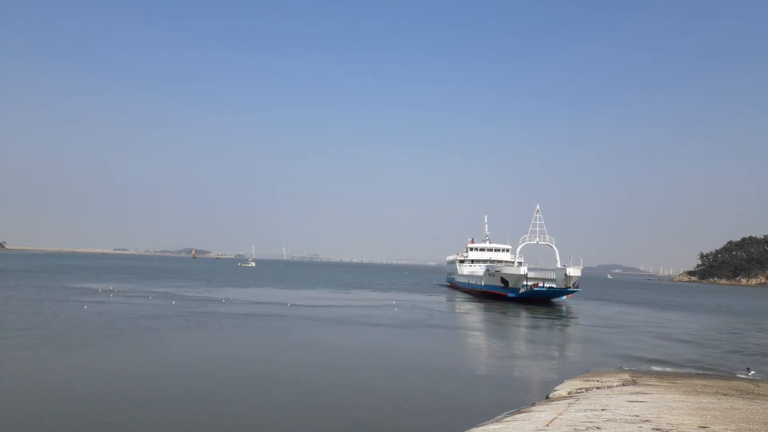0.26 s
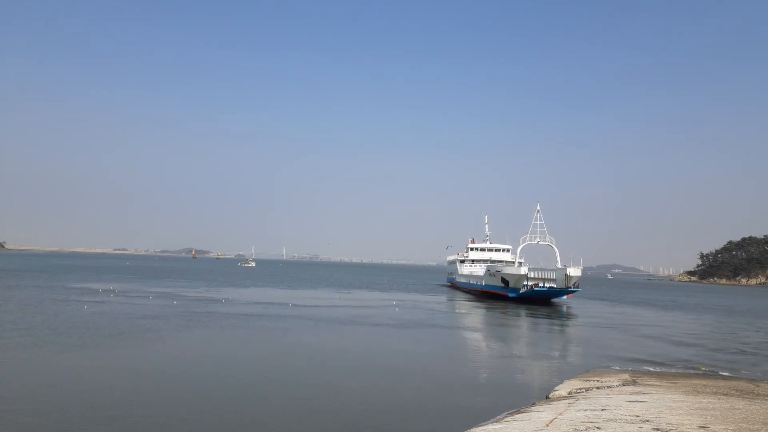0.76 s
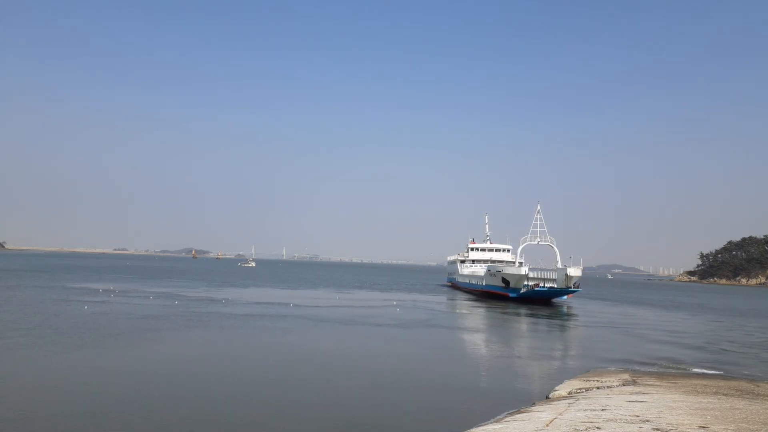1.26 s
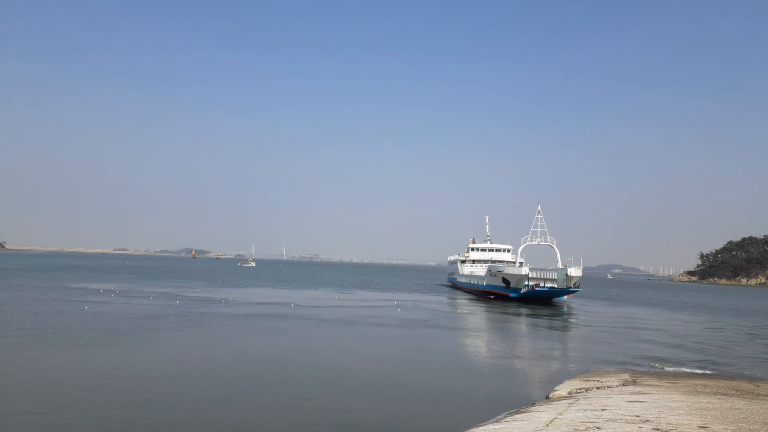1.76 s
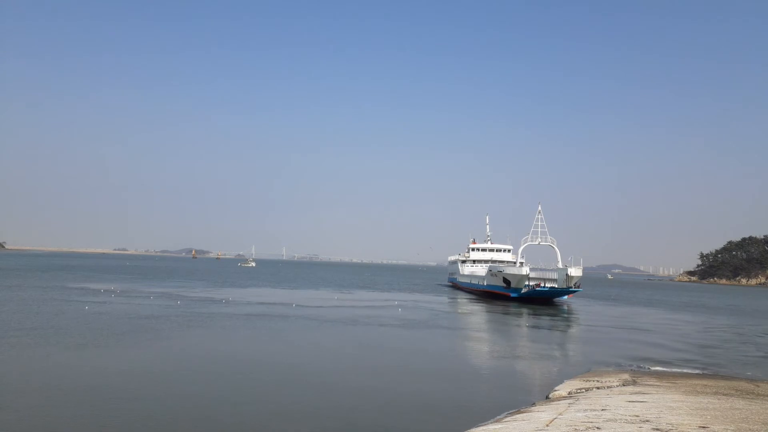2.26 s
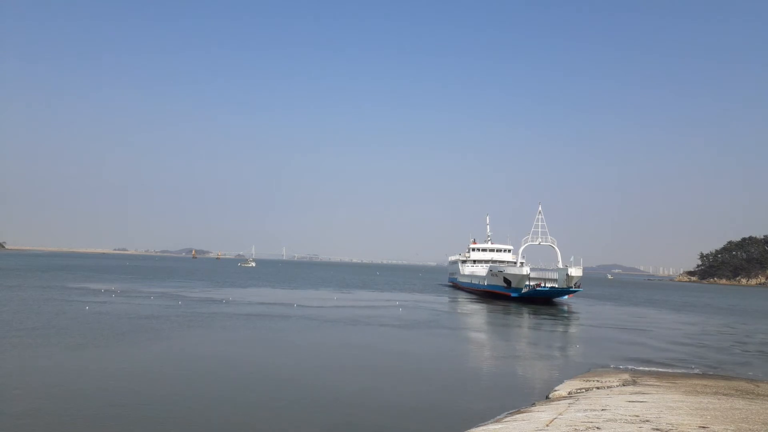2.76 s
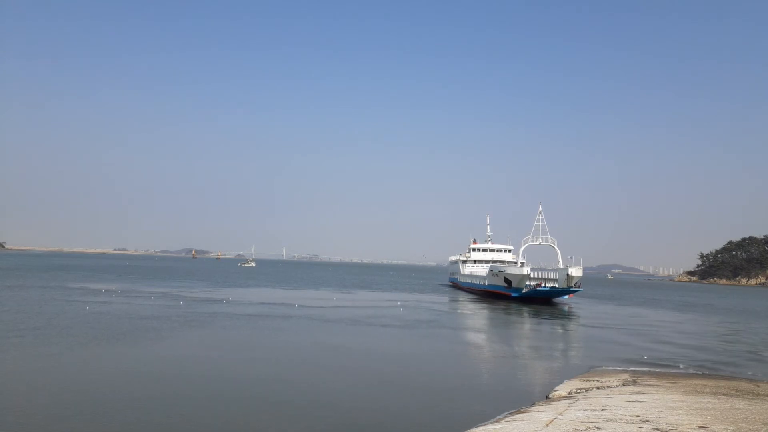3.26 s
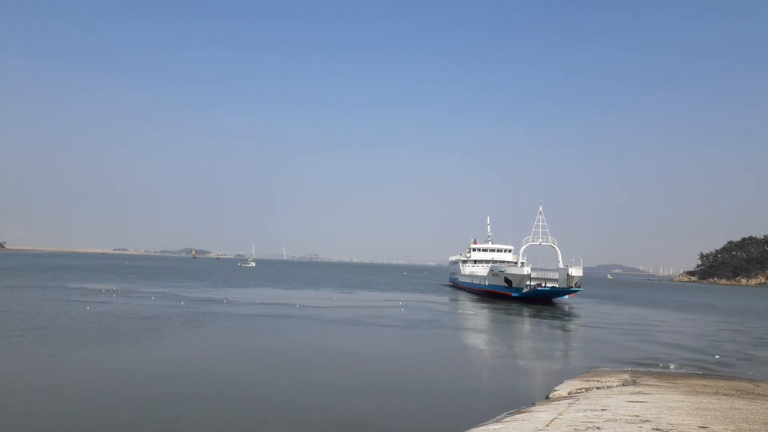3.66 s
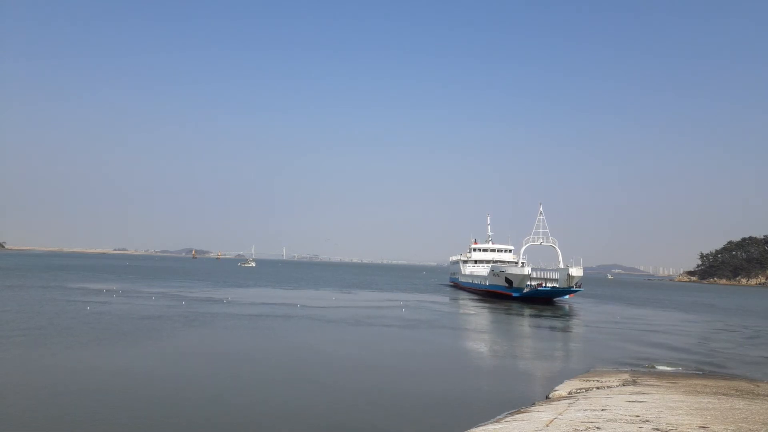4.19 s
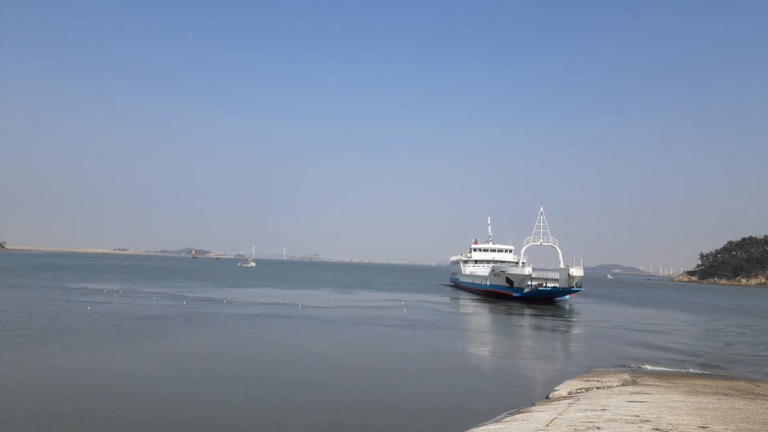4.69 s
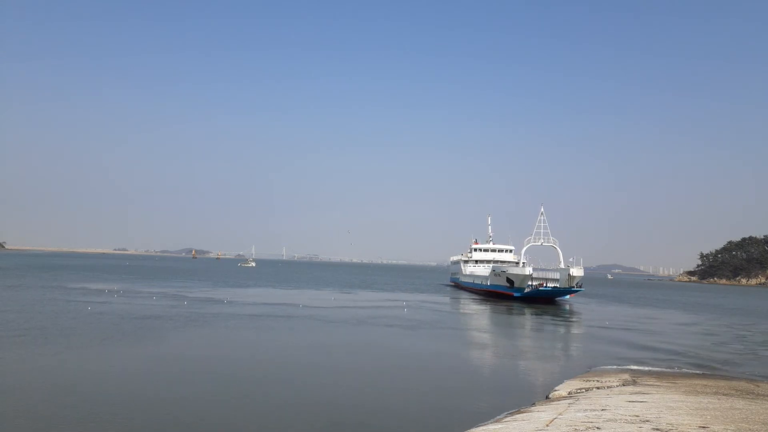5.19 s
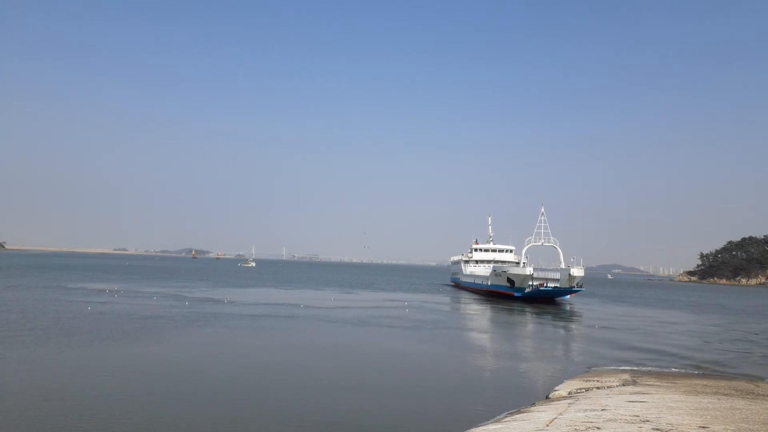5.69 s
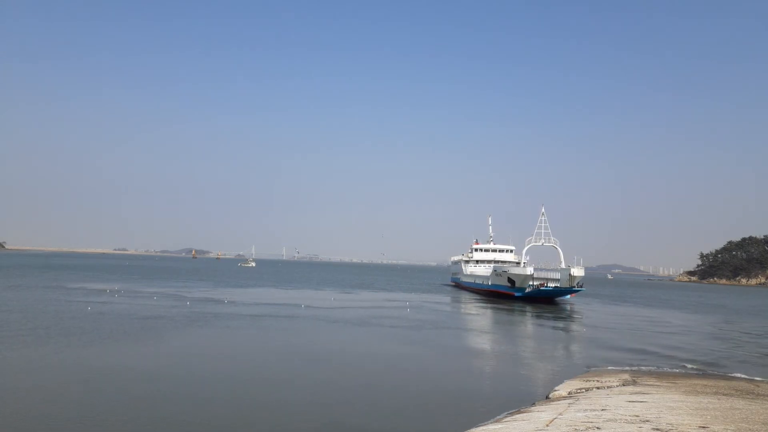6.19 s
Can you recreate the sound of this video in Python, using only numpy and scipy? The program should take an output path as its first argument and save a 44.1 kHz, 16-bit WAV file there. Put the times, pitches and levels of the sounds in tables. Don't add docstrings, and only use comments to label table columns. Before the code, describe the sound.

Three brief, rising-then-sagging seagull cries sound over a boat diesel's broad low rumble, with faint lapping water and soft microphone hiss.

```python
import sys
import numpy as np
from scipy import signal
from scipy.fft import rfft, irfft
from scipy.io import wavfile
from scipy.ndimage import uniform_filter1d, map_coordinates

SR = 44100
rng = np.random.default_rng(int(sys.argv[2]) if len(sys.argv) > 2 else 0)


def gain_from_db(level_db):
    decades = np.asarray(level_db, float) / 20
    return 10 ** decades


def file_out(sig):
    cols = np.atleast_2d(sig).T
    lim = np.clip(cols, -1, 1)
    pcm = np.round(lim * 32767).astype(np.int16)
    wavfile.write(sys.argv[1], SR, pcm)


N = 284004

# frequency in Hz, density in dB per Hz.
HISS_COLOUR = [(2000, -27), (3300, -8), (3700, -15.5), (4500, -9), (5300, -5), (5700, -2), (8000, 0),
               (9900, -1.5), (10200, -5), (11500, -6), (11800, -10.5), (15700, -9)]
# time in seconds, level in dB, swing in Hz, length in seconds.
AIR_PUSHES = [
    (1.105, -25, 80, .0075),
    (1.122, -31, 80, .005),
    (5.938, -32, 90, .007),
    (6.081, -33, 80, .008),
]

# time in seconds, level in dB, length in seconds.
SLAPS = [
    (2.775, -54.5, 0.034),
    (5.3, -65, 0.067),
    (1.11, -56, 0.024),
    (.88, -67, 0.048),
    (1.4, -67, 0.036),
]
# frequency in Hz, density in dB per Hz.
SLAP_COLOUR = [(400, -30), (700, -2), (1000, 0), (1300, -15), (2500, -34), (4500, -44), (7000, -60)]

# multiple of the firing rate, level in dB.
FIRING_ORDERS = [(1, -63), (2, -48.5), (3, -58), (5, -68)]
# frequency in Hz, level in dB.
MACHINE_HUMS = [(59.9, -63), (72, -57), (76.55, -57), (83.5, -54), (84.4, -58), (89.3, -60), (119.5, -63),
                (153.1, -62)]
# time in seconds, level in dB.
ENGINE_REACH = [(0.0, -47.5), (0.38, -47.5), (0.72, -46), (1.27, -46.5), (1.5, -47.5), (2.11, -45.5),
                (2.67, -47.5), (2.82, -48.5), (4.14, -48.5), (4.64, -46.5), (4.9, -48.5), (6.44, -46.5)]
# time in seconds, level in dB.
LINE_CARRY = [(0.0, -39.5), (0.52, -43), (1.54, -48.5), (1.67, -36.5), (1.92, -53), (2.33, -38),
              (2.56, -45), (3.19, -49), (4.21, -41), (4.41, -48.5), (4.55, -38.5), (5.06, -47),
              (5.26, -41.5), (5.65, -51.5), (6.04, -37), (6.44, -57)]
# frequency in Hz, density in dB per Hz.
RUMBLE_COLOUR = [(20, -49), (33, -28.5), (52, -3), (75, 2.5), (110, -2.5), (180, -7.5), (260, -20)]
# frequency in Hz, density in dB per Hz.
ROAR_COLOUR = [(120, -36.5), (180, -3), (280, -4), (430, -6), (505, -12), (630, -9), (800, -17),
               (1000, -47.5)]
# frequency in Hz, density in dB per Hz.
RASP_COLOUR = [(600, -34.5), (820, -1), (1050, -5), (1300, -7), (1560, -14.5), (1700, -19.5), (1900, -45)]
# frequency in Hz, density in dB per Hz.
WASH_COLOUR = [(1500, -30), (1850, 1), (2500, -2.5), (3000, -11), (4000, -11), (5000, -35)]
# time in seconds, lift in dB, length in seconds.
RUMBLE_GUSTS = [
    (0.554, 5.5, 0.27),
    (1.258, 5.5, 0.24),
    (2.354, 2.5, 0.17),
    (3.15, 1, 0.17),
    (4.3, 1, 0.26),
    (5.3, 0.5, 0.13),
    (6.054, 0.5, 0.26),
]
# time in seconds, lift in dB, length in seconds.
WAKE_RUNS = [
    (.5, 1.5, 0.16),
    (1.102, 3.5, 0.35),
    (3.1, 3, .2),
    (4.0, 2, .2),
    (5.7, -3, .3),
]

# voice break in seconds, hold in seconds, crest in Hz, sag as a share of
# the crest, climb of the glide in Hz per second.
GULL_CRIES = [
    (.331, .144, 770, .09, 3000),
    (2.201, .174, 784, .145, 3400),
    (5.077, .172, 787, .13, 3550),
]
# how long before the break the 3rd to 7th partial enter, in seconds.
PARTIAL_LEADS = [(.004, .066, 0, .034, 0), (.028, .068, .084, .04, .03), (.021, .04, .074, 0, 0)]
# what the beak lets out of the 2nd to 8th partial, in dB.
BEAK_GAPES = [(0, 0, -6, -6, -5, -18, -20), (0, -3, 4, -1, 1, -6, -4), (1, -2, -1, 1, -8, -3, -12)]
# frequency in Hz, level in dB.
GLIDE_THROAT = [(1800, -75), (2100, -62), (2400, -64), (2850, -67), (3050, -92), (3400, -83), (3900, -80),
                (4150, -93)]
# one value per partial, 2nd to 8th, over the throat in dB.
GLIDE_STRANDS_DB = [0, 0, 0, -4, 0, 10, 0]
# level in dB, loudest point as a share of the hold,
# drop at the start in dB, drop at the end in dB.
HELD_PARTIALS = [(-57.5, .68, 6, 15), (-62.5, .1, 1, 17), (-66, .45, 7, 18), (-78, .72, 12, 16),
                 (-78, .3, 5, 9)]
FAINT_PARTIALS = [(-86, .3, 4, 10)] * 2
# time in seconds, level in dB, centre in Hz, width in Hz,
# length in seconds.
THROAT_CROAKS = [
    (.494, -80, 2200, 250, .008),
    (2.39, -78, 1650, 300, .01),
    (2.37, -81, 3100, 900, .015),
    (5.264, -78, 2200, 500, .012),
    (5.22, -81, 3100, 700, 0.02),
    (5.24, -85, 4030, 900, 0.02),
]
# level in dB, then decay by 60 dB in seconds.
SHORE_ECHO = (-15, .15)


def unit(x):
    return x / np.sqrt(np.mean(x ** 2) + 1e-20)


def level_curve(rows):
    s, db = np.transpose(rows)
    return np.interp(np.arange(N) / SR, s, db)


def bump(s, length):
    return np.exp(-((np.arange(N) / SR - s) / length) ** 2)


def wobble(rate):
    knots = rng.standard_normal(int(N * rate / SR) + 4)
    return map_coordinates(knots, [np.arange(N) * rate / SR])


def rush(spectrum, patchy_db):
    z = signal.stft(rng.standard_normal(N + 512), nperseg=512)[2]
    field = uniform_filter1d(rng.standard_normal(z.shape), size=5, axis=0)
    field = uniform_filter1d(field, size=16, axis=1)
    x = signal.istft(z * gain_from_db(patchy_db * unit(field)), nperseg=512)[1]
    f, db = np.transpose(spectrum)
    hz = np.fft.rfftfreq(len(x), 1 / SR)
    gain = gain_from_db(np.interp(np.log(hz + 1), np.log(f + 1), db, -120, -120))
    return unit(irfft(rfft(x) * gain, len(x))[:N])


def tone(hz, db):
    turns = np.cumsum(hz) / SR + rng.random()
    return np.sqrt(2) * gain_from_db(db) * np.sin(2 * np.pi * turns)


def microphone_hiss():
    return gain_from_db(-76.5 + 0.32 * wobble(4.15)) * rush(HISS_COLOUR, patchy_db=0.74)


def breeze():
    t = np.arange(N) / SR
    pushes = np.zeros(N)
    for s, db, hz, length in AIR_PUSHES:
        pushes += gain_from_db(db) * bump(s, length) * np.sin(2 * np.pi * hz * (t - s))
    return signal.sosfiltfilt(signal.butter(3, 42, "high", fs=SR, output="sos"), pushes)


def shore():
    puffs = sum(gain_from_db(db) * bump(s, length) for s, db, length in SLAPS)
    return puffs * rush(SLAP_COLOUR, patchy_db=-0.5)


def ferry():
    shaft_hz = 35.24 * (1 + 0.0017 * wobble(0.687))
    lines = sum(tone(k * shaft_hz, db + 2.0 * wobble(1.51)) for k, db in FIRING_ORDERS)
    lines += sum(tone(hz * (1 + 0.0021 * wobble(1)), db + 3 * wobble(1.614)) for hz, db in MACHINE_HUMS)
    carry_db = 0.95 * (level_curve(LINE_CARRY) + 43.5)

    reach_db = level_curve(ENGINE_REACH) - np.mean(ENGINE_REACH, axis=0)[1]
    gust_db = sum(db * bump(s, length) for s, db, length in RUMBLE_GUSTS)
    wake_db = sum(db * bump(s, length) for s, db, length in WAKE_RUNS)
    swell = wobble(6.6)
    rumble_db = -46 + 0.6 * reach_db + gust_db + 0.53 * swell
    roar_db = -47.5 + reach_db + 0.43 * swell
    rasp_db = -63 + 0.58 * reach_db + 0.22 * gust_db + 0.29 * swell
    wash_db = -84.5 + 0.8 * reach_db + wake_db + 0.63 * swell

    body = gain_from_db(rumble_db) * rush(RUMBLE_COLOUR, patchy_db=0.5)
    body += gain_from_db(roar_db) * rush(ROAR_COLOUR, patchy_db=1.12)
    body += gain_from_db(rasp_db) * rush(RASP_COLOUR, patchy_db=1.48)
    wash = gain_from_db(wash_db) * rush(WASH_COLOUR, patchy_db=2.2)
    return gain_from_db(carry_db) * lines + body + wash


def croaks():
    air = np.zeros(N)
    for s, db, hz, width, length in THROAT_CROAKS:
        band = [(hz - width, -25), (hz, 0), (hz + width, -25)]
        air += gain_from_db(db) * bump(s, length) * rush(band, patchy_db=2)
    return air


def scatter(voice):
    echo_db, t60 = SHORE_ECHO
    size = SR // 4
    tail = rng.standard_normal(size) * gain_from_db(-60 * np.arange(size) / SR / t60)
    return voice + gain_from_db(echo_db) * signal.fftconvolve(voice, tail / np.linalg.norm(tail))[:N]


def cry_pitch(t, u, crest_hz, sag, climb, tremble):
    crest, scoop, hoarse = 0.38, 0.035, 2.5
    rise = scoop * np.maximum(1 - u / crest, 0) ** 2.5
    fall = sag * (np.maximum(u - crest, 0) / (1 - crest)) ** 2.4
    glide_hz = 0.915 * crest_hz + climb * t + 6000 * t ** 2
    hz = uniform_filter1d(np.where(t < 0, glide_hz, crest_hz * (1 - rise - fall)), size=130)
    return hz * (1 + np.where(t < 0, hoarse, 1 + hoarse * u ** 5) * tremble)


def gull():
    attack_s, release_s, grow_db_per_s, breath_db = 0.006, 0.007, 200, -81
    voice, breath, clock = np.zeros(N), np.zeros(N), np.arange(N) / SR
    throat_hz, throat_db = np.transpose(GLIDE_THROAT)
    tremble = 0.0034 * wobble(160)
    flickers_db = [0.9 * wobble(90) + (4.5 * wobble(45) if k > 4 else 0) for k in range(7)]
    for (s, hold, crest_hz, sag, climb), leads, gape in zip(GULL_CRIES, PARTIAL_LEADS, BEAK_GAPES):
        near = np.abs(clock - s - 0.04) < 0.17
        t = clock[near] - s
        u = np.maximum(t / hold, 0)
        pitch = cry_pitch(t, u, crest_hz, sag, climb, tremble[near])
        shut = np.clip((hold - t) / release_s + 1, 0, 1) ** 2
        starts = [0, *leads, 0]
        for k, (top_db, at, early_db, late_db) in enumerate(HELD_PARTIALS + FAINT_PARTIALS):
            hz = (k + 2) * pitch
            swell_in_db = early_db * np.maximum(1 - u / at, 0)
            fade_db = late_db * (np.maximum(u - at, 0) / (1 - at)) ** 1.8
            held_db = top_db + gape[k] - swell_in_db - fade_db
            strand_db = gape[k] if k == 2 else GLIDE_STRANDS_DB[k]
            glide_db = np.interp(hz, throat_hz, throat_db) + grow_db_per_s * t + strand_db
            level_db = uniform_filter1d(np.where(t < 0, glide_db, held_db), size=200)
            opening = np.clip((t + starts[k]) / attack_s + 1, 0, 1) ** 2
            voice[near] += opening * shut * tone(hz, level_db + flickers_db[k][near])
        breath += gain_from_db(breath_db + gape[2]) * bump(s + hold / 3, hold * 1.05)
    voice += breath * rush(WASH_COLOUR, patchy_db=-1.5)
    return scatter(voice + croaks())


def scene():
    return (breeze() + shore() + ferry() + gull())[None]


def roll_off(x):
    return signal.sosfilt(signal.butter(12, 15640, fs=SR, output="sos"), x)


def record(dry):
    edge = np.minimum(np.arange(N), np.arange(N)[::-1])
    gate = np.minimum(edge / 150, 1)
    return roll_off(gate * (dry + microphone_hiss()))


dry = scene()
out = record(dry)
file_out(out)
```